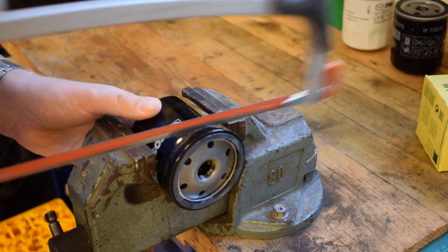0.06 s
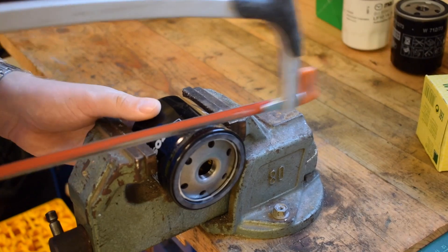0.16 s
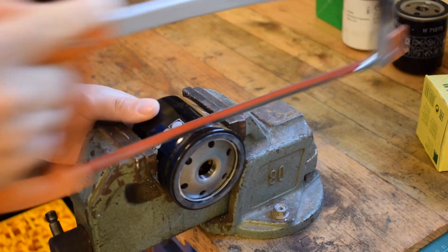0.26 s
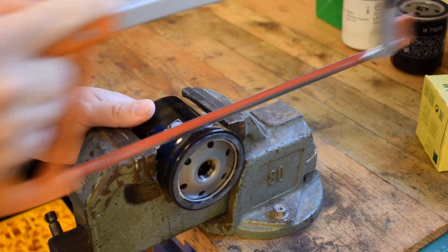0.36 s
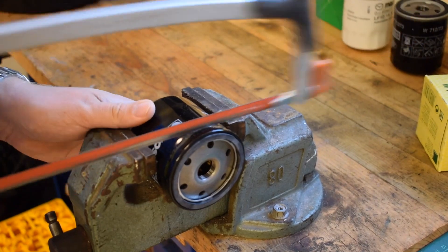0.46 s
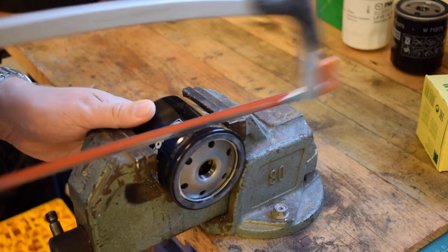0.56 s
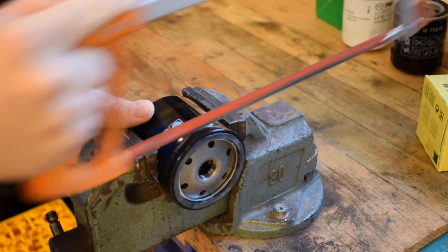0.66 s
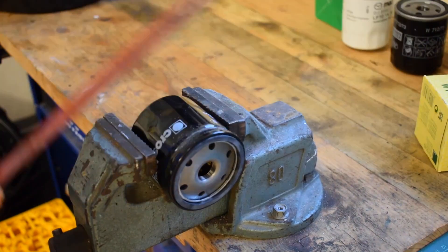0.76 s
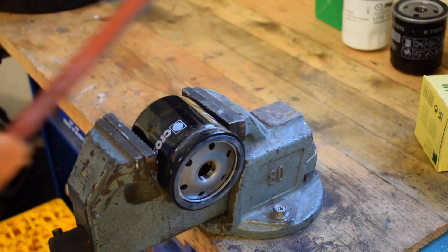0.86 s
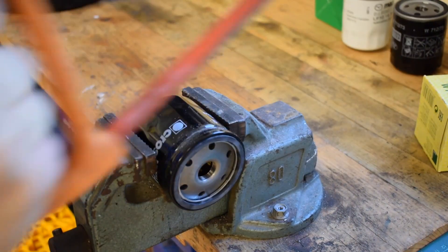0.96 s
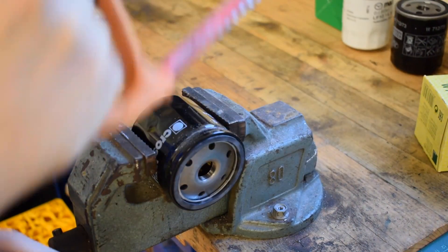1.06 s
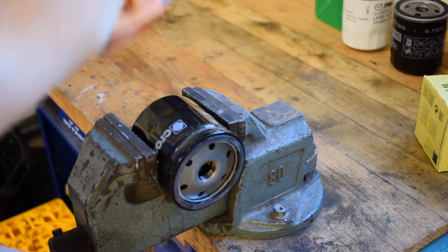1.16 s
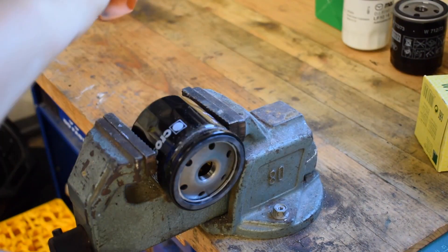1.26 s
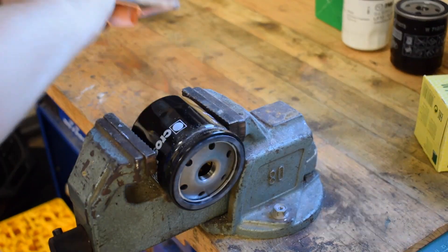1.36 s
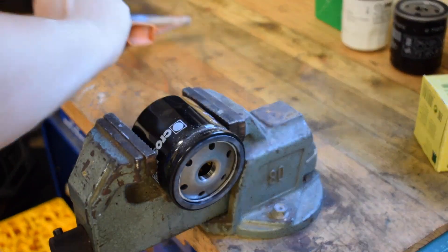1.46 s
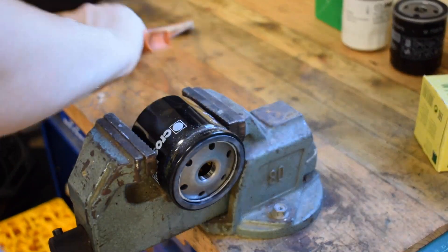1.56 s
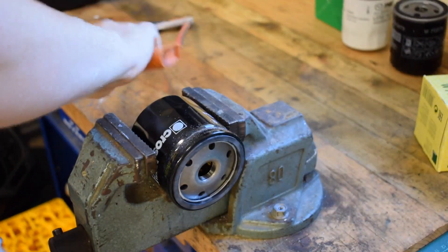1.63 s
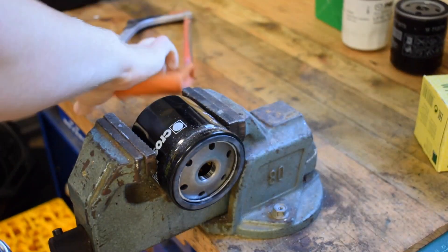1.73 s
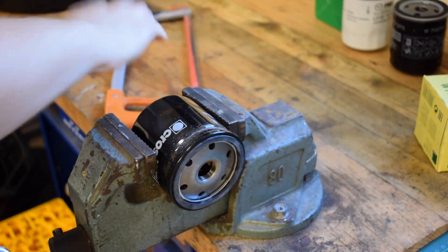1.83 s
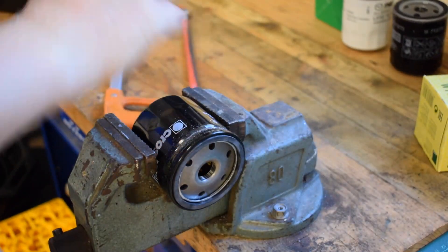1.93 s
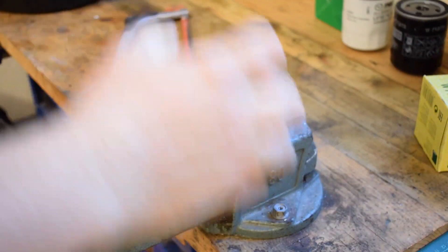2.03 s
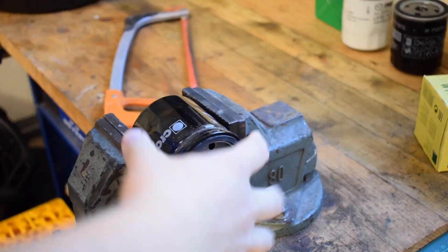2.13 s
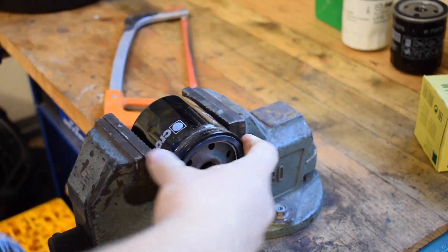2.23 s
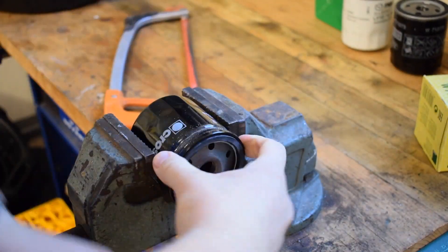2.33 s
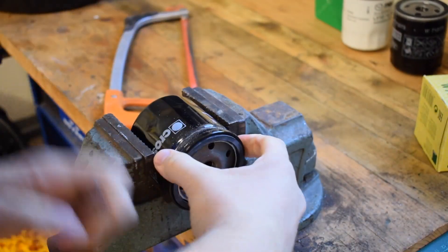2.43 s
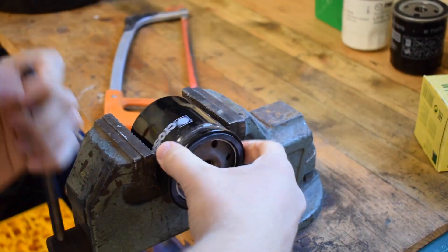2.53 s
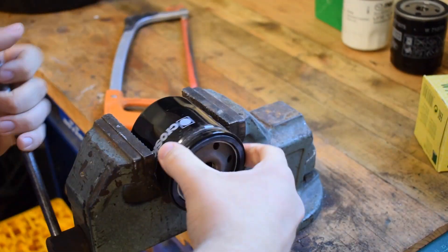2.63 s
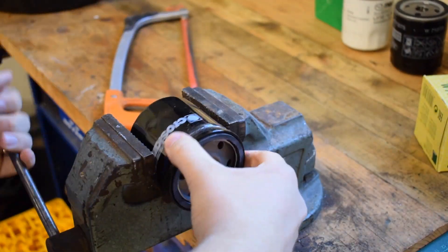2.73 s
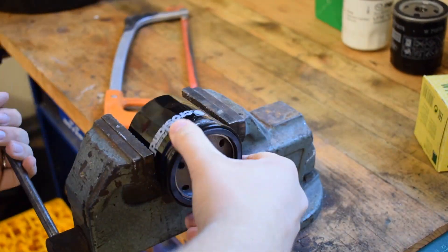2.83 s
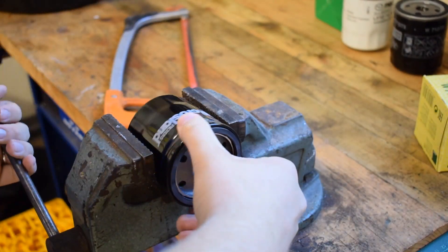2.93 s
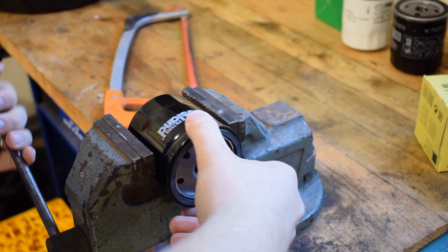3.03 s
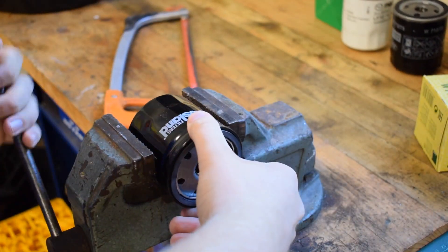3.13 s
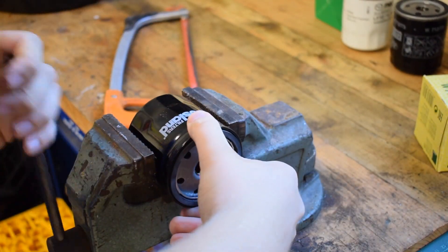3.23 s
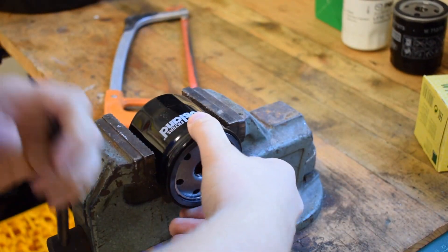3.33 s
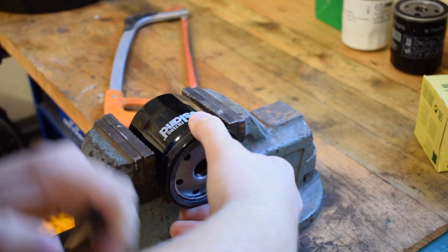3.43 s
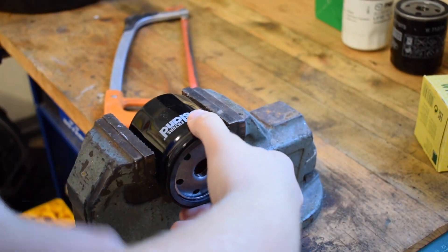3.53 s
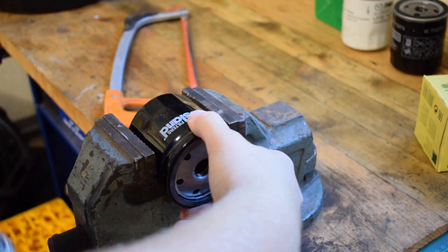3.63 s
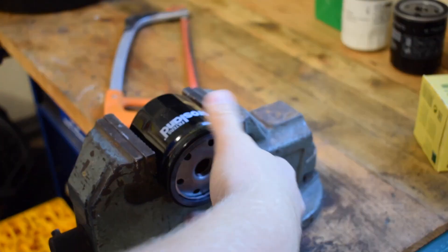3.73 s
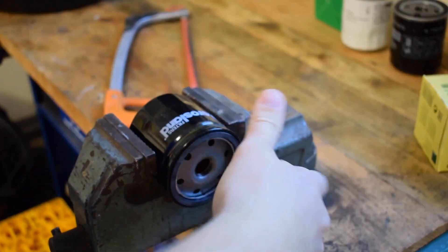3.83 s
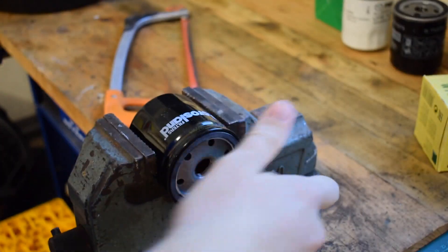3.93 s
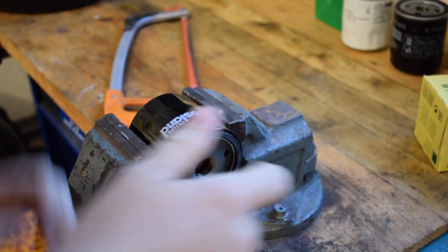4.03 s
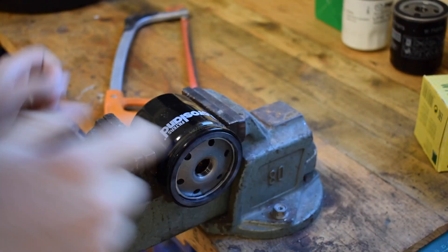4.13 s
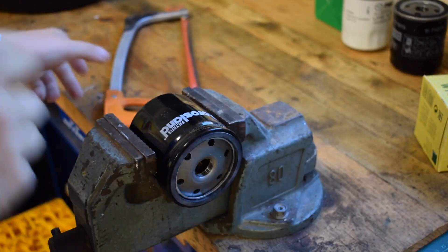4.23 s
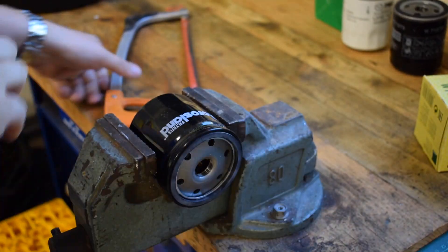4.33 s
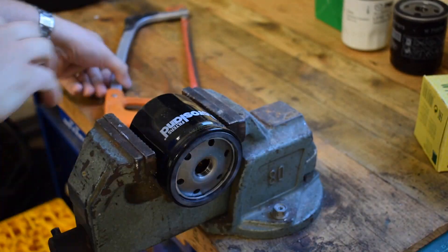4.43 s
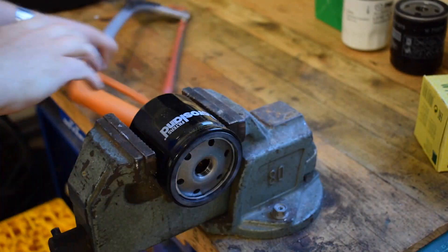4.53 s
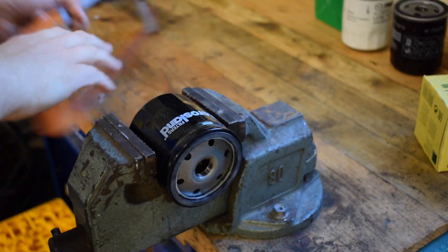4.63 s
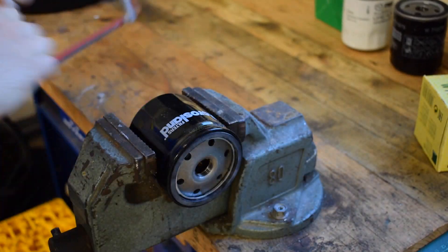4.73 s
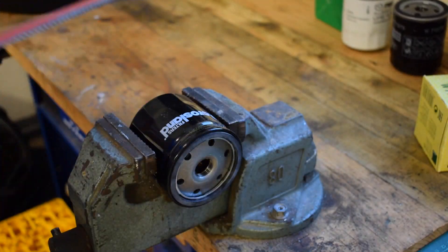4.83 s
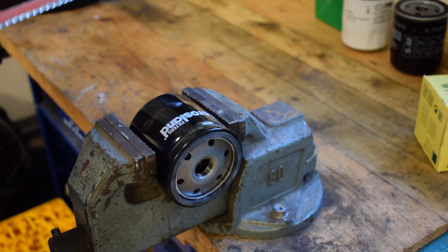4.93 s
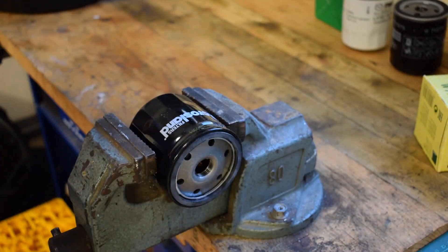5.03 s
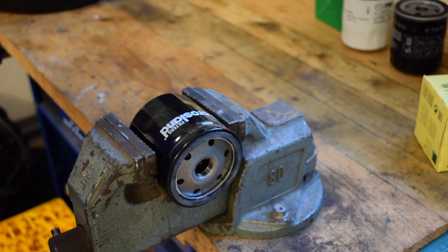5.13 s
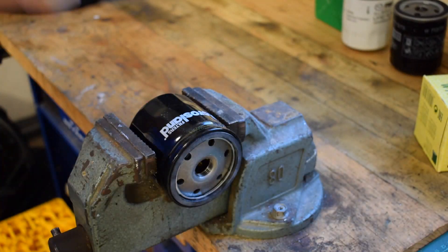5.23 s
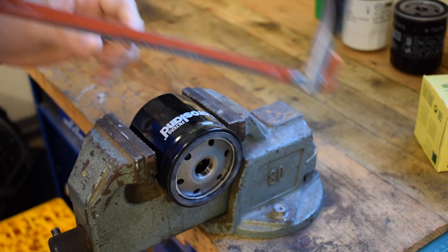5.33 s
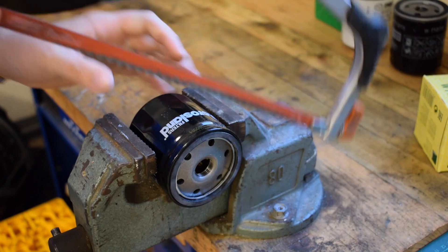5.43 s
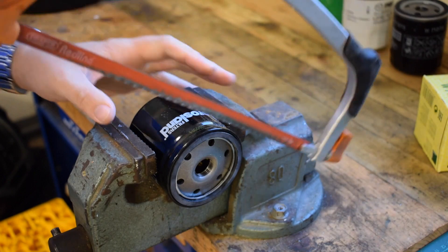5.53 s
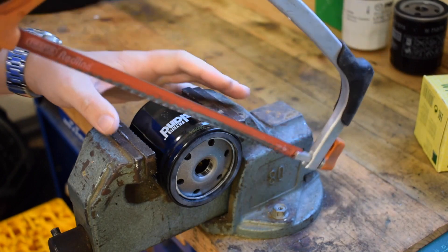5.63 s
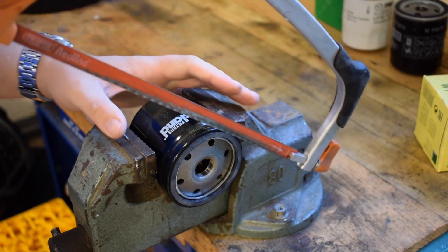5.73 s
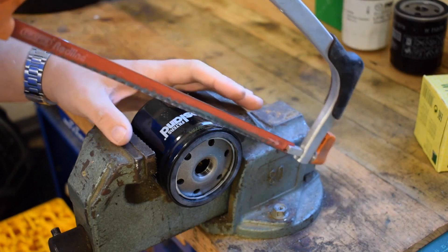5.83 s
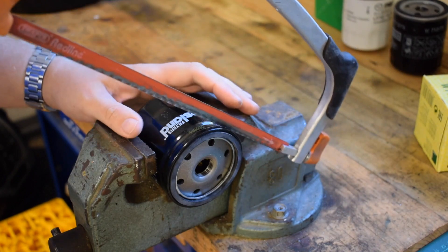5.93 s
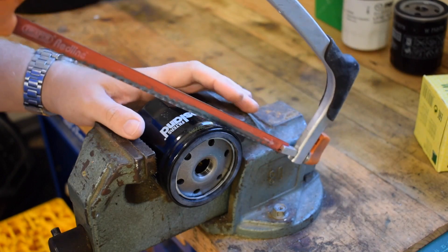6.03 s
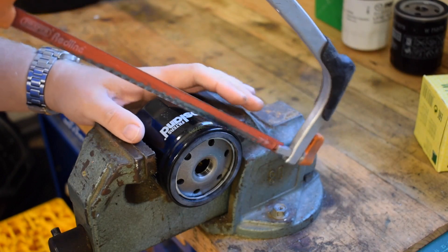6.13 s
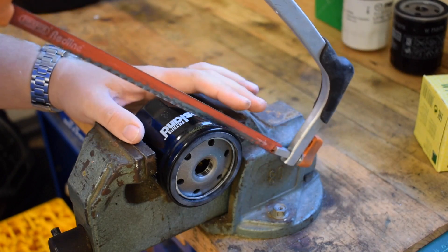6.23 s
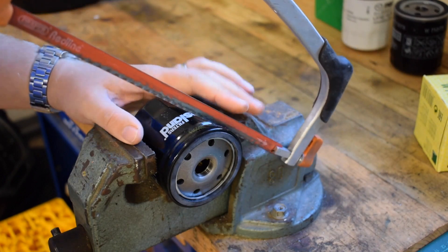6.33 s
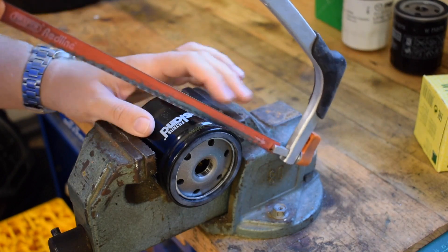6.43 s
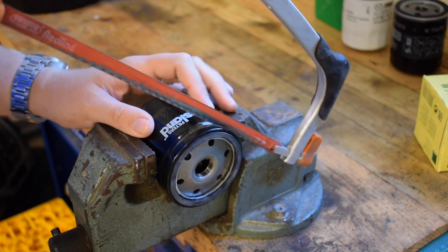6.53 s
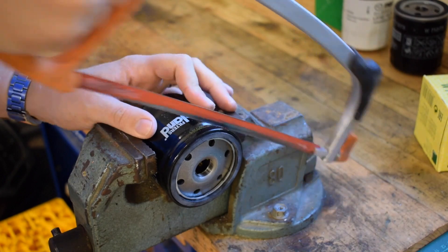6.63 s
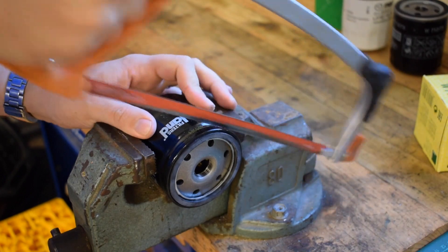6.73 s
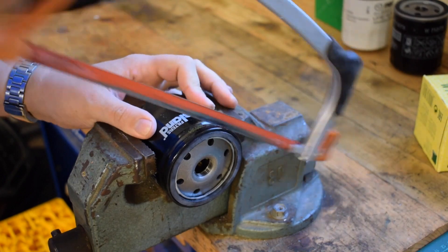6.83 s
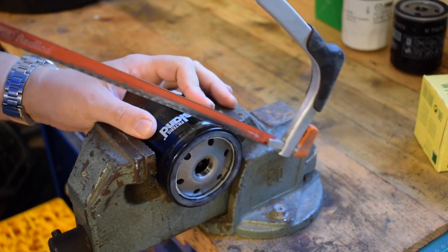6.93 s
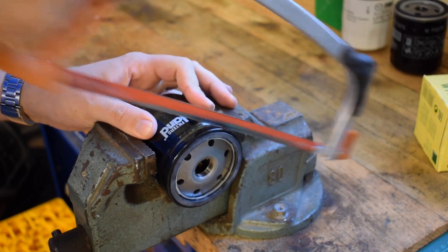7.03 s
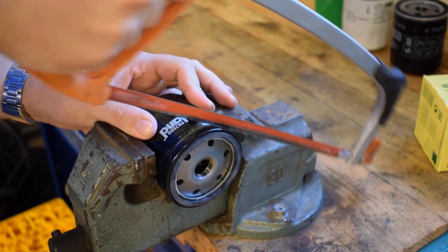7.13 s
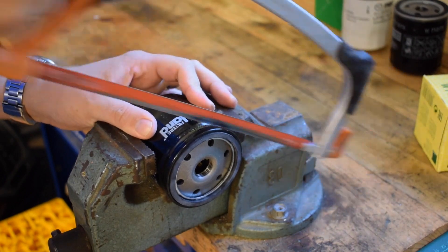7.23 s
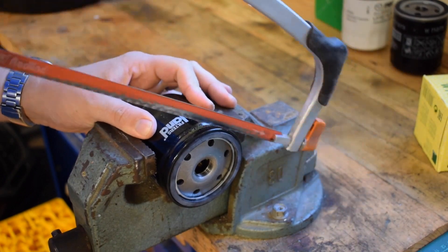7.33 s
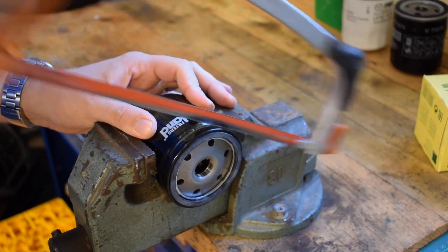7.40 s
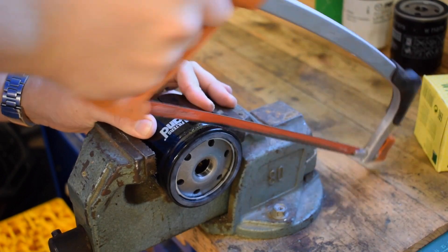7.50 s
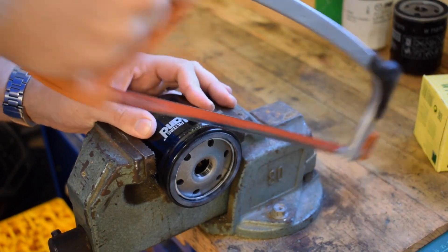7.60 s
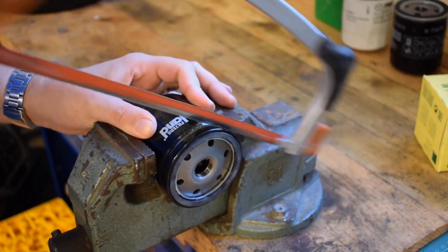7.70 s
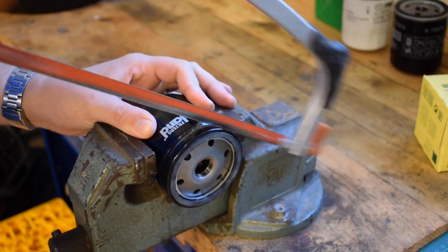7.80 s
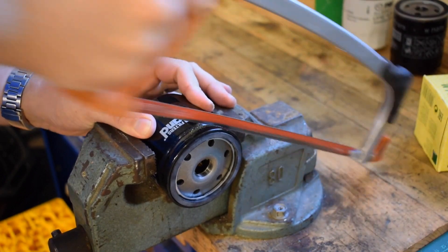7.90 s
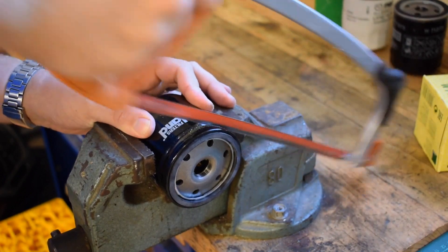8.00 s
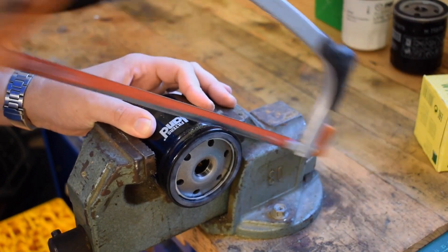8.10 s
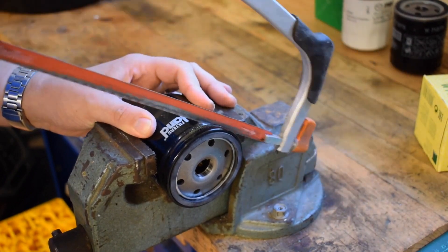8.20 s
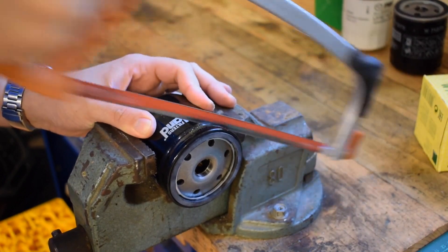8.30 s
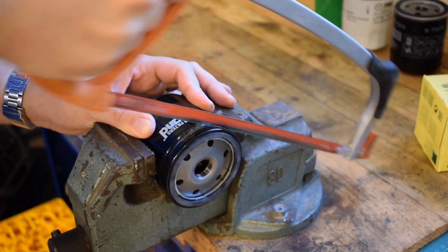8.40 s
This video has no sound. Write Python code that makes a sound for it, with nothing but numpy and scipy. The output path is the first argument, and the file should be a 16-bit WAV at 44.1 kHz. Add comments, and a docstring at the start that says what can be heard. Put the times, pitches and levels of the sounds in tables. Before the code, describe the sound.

Dry, close microphone at a workbench: gritty back-and-forth metal sawing with a hollow can resonance, stopping abruptly. Heavy wood and steel clatter peaks into distortion, then quiet garage noise with faint handle ticks and low handling rumble. A cluster of knocks as the saw is lifted, sparse light steel clinks while lining up, then longer rasping strokes, tooth whine rising and falling with blade speed.

```python
"""In a garage, close by, a hacksaw cuts a steel can held in a bench vice.
After four strokes the saw is dropped on the wooden bench, the can is turned and clamped again,
the saw is picked up, clinks against the metal and cuts on for ten strokes.
Sawing is noise and tooth bites sent through resonances, plus a whine at the tooth rate and squeals.
Knocks, clinks and ticks are fading noise and ringing tones; the loudest overload the microphone."""
import sys
import numpy as np
from scipy import signal
from scipy.fft import rfft, irfft, next_fast_len
from scipy.io import wavfile

SR = 44100
rng = np.random.default_rng(int(sys.argv[2]) if len(sys.argv) > 2 else 0)


def to_wav(s):
    """Save 16-bit WAV."""
    ch = np.atleast_2d(s).T  # columns
    pcm = np.round(np.clip(ch, -1, 1) * 32767)  # PCM
    wavfile.write(sys.argv[1], SR, pcm.astype(np.int16))


N = 373086   # length of the scene in samples


def from_db(db):
    """Decibels to gain."""
    return 10 ** (np.asarray(db) / 20)


def rms_one(x):
    """Scale to unit power."""
    return x / np.sqrt(np.mean(x ** 2) + 1e-20)


def at_hz(points, hz):
    """Read a table on a log-frequency axis."""
    table_hz, value = np.transpose(points)
    return np.interp(np.log(hz + 1e-3), np.log(table_hz), value)


def colour(x, spectrum):
    """Give x a spectrum that falls away beyond the table's ends; unit power."""
    size = next_fast_len(len(x))
    hz = np.arange(size // 2 + 1) * SR / size + 1e-3
    low_skirt = np.minimum(1, hz / spectrum[0][0]) ** 2
    high_skirt = np.minimum(1, spectrum[-1][0] / hz) ** 2
    gain = from_db(at_hz(spectrum, hz)) * low_skirt * high_skirt
    return rms_one(irfft(rfft(x, size) * gain, size)[:len(x)])


def drift(rate, size):
    """Smooth chance with spread 1, heading for a new random value rate times a second."""
    knots = np.arange(size) * rate / SR
    return rms_one(np.interp(knots, np.arange(N // 20), rng.standard_normal(N // 20)))


def resonate(x, hz, width):
    """A resonance with gain 1 on top; width in Hz."""
    r = np.exp(-np.pi * width / SR)
    top = np.array([1, 0, -1]) * (1 - r * r) / 2
    return signal.lfilter(top, [1, -2 * r * np.cos(2 * np.pi * hz / SR), r * r], x)


def clicks(times, sizes):
    """One impulse for each event."""
    out = np.full(N, 1e-18)
    np.add.at(out, (times * SR).astype(int), sizes)
    return out


def ring(x, hz, t60):
    """A unit click sets a sine of height 1 ringing; it falls by 60 dB in t60 seconds."""
    r, w = from_db(-60 / (t60 * SR)), 2 * np.pi * hz / SR
    return signal.lfilter([0, np.sin(w)], [1, -2 * r * np.cos(w), r * r], x)


def struck(times, db, modes, spread_db):
    """Every blow wakes each mode of an object with a strength of its own."""
    sizes = from_db(db[:, None] + spread_db * rng.standard_normal((len(times), len(modes))))
    out = 0
    for k, (hz, level, t60) in enumerate(modes):
        out = out + (-1) ** k * ring(clicks(times, from_db(level) * sizes[:, k]), hz, t60)
    return out


def softness(hz, corner_hz):
    """A soft contact gives little above its corner, apart from a faint click."""
    return 1 / np.sqrt(1 + (hz / corner_hz) ** 6) + .004


def blows(times, db, corner_hz, share, spectrum, decay):
    """Each blow wakes a dense crowd of modes, noise that dies away band by band."""
    edges = np.geomspace(45, 17000, 25)   # bands about a third of an octave wide
    centres = np.sqrt(edges[1:] * edges[:-1])
    gains = from_db(at_hz(spectrum, centres)) * np.sqrt(np.diff(edges))
    gains = gains * softness(centres, corner_hz[:, None])
    gains *= (from_db(db) / np.linalg.norm(gains, axis=1))[:, None]
    white, age, out = rng.standard_normal((2, N)), np.arange(SR) / SR, np.zeros(N)
    crack = 0.66 + 0.55 * np.exp(-age / 0.0049)   # the first moments stand above the tail
    starts = (times * SR).astype(int)
    for k, hz in enumerate(centres):
        band_filter = signal.butter(2, edges[k:k + 2], "band", fs=SR, output="sos")
        band = rms_one(signal.sosfilt(band_filter, white[k % 2]))
        swell = crack * (1 - np.exp(-age * min(hz, 1500)))   # low bands build up more slowly
        for at, gain, t60 in zip(starts, gains[:, k], share * at_hz(decay, hz)):
            fade = swell * np.exp(-np.log(1000) * age / t60)
            out[at:at + SR] += gain * band[at:at + SR] * fade[:N - at]
    return out


def crowd(x, above_hz, t60, wet):
    """Thin steel and the near walls add a dense crowd of short resonances."""
    age = np.arange(SR // 5) / SR
    tail = rng.standard_normal(len(age)) * np.exp(-np.log(1000) * age / t60)
    tail = tail / np.linalg.norm(tail)
    tail = signal.sosfilt(signal.butter(2, above_hz, "high", fs=SR, output="sos"), tail)
    direct = signal.sosfilt(signal.butter(1, above_hz, "high", fs=SR, output="sos"), x)
    dry_share, wet_share = 1 / np.hypot(1, wet), wet / np.hypot(1, wet)
    return x - (1 - dry_share) * direct + wet_share * signal.fftconvolve(x, tail)[:len(x)]


FIRST_SPAN, SECOND_SPAN = (-.03, .805), (6.575, 8.63)   # the blade is in the cut: from s, to s


def in_cut(times):
    """Whether the blade is pressed into the can at these times."""
    return sum((times > start) & (times < end) for start, end in (FIRST_SPAN, SECOND_SPAN)) > 0


# Colour of the steady garage noise. Each row: pitch in Hz, relative level in dB per Hz.
AIR = [(30, -9), (60, -10), (110, -12.5), (215, -10), (300, -16.5), (470, -14), (800, -17.5), (1300, -17),
       (3000, -25.5), (8900, -33), (15700, -44)]
# Colour of the low rumble. Each row: pitch in Hz, relative level in dB per Hz.
RUMBLE = [(45, -8.5), (100, -1.5), (150, -2), (210, 1), (330, -7), (470, -9), (1200, -17.5), (2500, -21.5)]
# The rumble's rise and fall while the saw is lifted away, the can is reset and the saw is lined up.
# Three lists, one for each step. Each row: time in seconds, level in dB before the trim below.
HANDLING = [
    [(0.83, -40), (0.978, -48), (1.354, -47.5), (1.53, -46)],
    [(3.0, -49.5), (3.142, -57), (3.622, -58.5), (4.28, -53)],
    [(4.8, -53.5), (5.608, -62.5), (5.838, -54), (6.55, -49)],
]
AIR_DB = -57
HANDLING_TRIM_DB, SAWING_RUMBLE_DB = 2, -33.5   # added to HANDLING; rumble of the bench under the saw


def background():
    """Steady garage noise and a low rumble of handling, stronger under the saw."""
    t = np.arange(N) / SR
    handling_db = HANDLING_TRIM_DB + np.interp(t, *np.vstack(HANDLING).T)
    rumble_db = np.where(in_cut(t), SAWING_RUMBLE_DB, handling_db)
    air = from_db(AIR_DB) * colour(rng.standard_normal(N), AIR)
    return air + from_db(rumble_db) * colour(rng.standard_normal(N), RUMBLE)


# Small steel ticks of the vice handle and the saw. Each row: start in seconds, level in dB.
TICKS = [(0.909, -58), (1.562, -33), (1.87, -13), (2.497, -44.5), (2.555, -43), (2.762, -40), (2.788, -60),
         (2.868, -47), (3.027, -50.5), (3.372, -56.5), (3.712, -52), (3.76, -56), (3.894, -62), (4.31, -44),
         (4.524, -47.5)]
# Colour of a tick's noise. Each row: pitch in Hz, relative level in dB per Hz.
TICK_COLOUR = [(2500, -28.5), (3800, -14), (4500, 0), (6000, -1), (8500, -3.5), (12000, -4), (16000, -14)]
# How long that noise lasts. Each row: pitch in Hz, seconds to fall 60 dB before TICK_RING_SHARE.
TICK_T60 = [(4000, 0.29), (14000, 0.1134)]
# Tones of the vice handle. Each row: pitch in Hz, relative level in dB, seconds to fall 60 dB.
HANDLE = [(4460, -3.5, .16), (4980, 0, .22), (5770, 1, 0.17), (6200, -6.5, 0.29), (7070, -3, .16),
          (8802, -8, .15), (11700, -7.5, .16), (12000, -11, .18)]
TICK_HZ, TICK_RING_SHARE = 11500, 0.95   # dull above this pitch; share of the noise's fading time


def vice(ring_db):
    """The loose handle ticks when the bench is jolted and as the jaws close on the can."""
    times, db = np.transpose(TICKS)
    alike = np.ones(len(times))
    ticks = blows(times, db, TICK_HZ * alike, TICK_RING_SHARE * alike, TICK_COLOUR, TICK_T60)
    return ticks + struck(times, db + ring_db, HANDLE, spread_db=0.5)


# Knocks that shake the bench. Each row: start in seconds, thud level in dB, pitch in Hz above which
# it is dull, seconds it rattles on, level of the frame's ring in dB.
KNOCKS = [(0.283, -20.5, 403, .01, -45), (1.56, -3, 1670, 0.097, -4.5), (1.714, -19.5, 1426, 0.07, -22),
          (1.87, 5.5, 3630, 0.15, -6), (2.006, -9.5, 1075, 0.13, -7), (2.161, -37, 990, 0.055, -33),
          (2.286, -37.5, 2200, .01, -57), (2.56, -26, 376, 0.12, -42), (2.764, -27.5, 530, 0.092, -46),
          (2.961, -41, 1100, 0.083, -58), (3.029, -36, 248, 0.021, -56), (4.311, -21.5, 880, 0.018, -39),
          (4.444, -18.5, 770, 0.045, -31), (4.487, -13.5, 1240, .1, -35), (4.535, -12, 940, 0.028, -25),
          (6.183, -27, 405, .06, -55), (7.966, 4, 426, .01, -27)]
BOUNCE_S = .03   # average gap between bounces
BOUNCE_LOSS_DB, RATTLE_FADE_DB = 7, 16.5   # drop to the bounces; further drop over the whole rattle
BOUNCE_DULL_HZ = 1100   # a bounce is a soft contact: dull above this at the most


def rattle(count):
    """Each knock is followed by softer, fading bounces for as long as it rattles."""
    s, db, corner_hz, rattle_s, ring_db = np.transpose(KNOCKS)[:, :, None]
    k = np.arange(count)
    bounce = k > 0   # number 0 is the knock itself
    delay = BOUNCE_S * (k + bounce * rng.uniform(-0.22, .25, (len(KNOCKS), count)))
    loss_db = bounce * BOUNCE_LOSS_DB + RATTLE_FADE_DB * delay / rattle_s
    dull_hz = np.where(bounce, np.minimum(corner_hz, BOUNCE_DULL_HZ), corner_hz)
    heard = delay <= rattle_s
    return [column[heard] for column in (s + delay, db - loss_db, dull_hz, ring_db - loss_db)]


# Colour of a thud on the bench. Each row: pitch in Hz, relative level in dB per Hz.
BENCH_COLOUR = [(50, -22), (100, -17), (180, -9), (260, -5.5), (370, -3), (460, -4), (620, 0.5),
                (850, -3.5), (1250, -6), (1700, -10.5), (2500, -14), (5000, -31), (9000, -25),
                (16000, -23.5)]
# How long a thud lasts. Each row: pitch in Hz, seconds to fall 60 dB before the shares below.
BENCH_T60 = [(80, 0.7), (260, 0.56), (700, 0.47), (1800, 0.51), (5000, 0.87), (14000, 0.25)]
# Saw frame and bench ringing on. Each row: pitch in Hz, relative level in dB, seconds to fall 60 dB.
FRAME = [(117, -26.5, 1.2), (217, -17.5, 0.87), (257, -9.5, 0.51), (306.8, -10.5, 0.45), (378, -3.5, 0.3),
         (396, -28, 2.2), (503, -12.5, 0.41), (573, -11.5, 0.81), (636, -4.5, 0.3), (755, -8.5, .45),
         (798, -10, 0.44), (894, -12, .3), (935, -9.5, 0.26), (1091, -10.5, .25), (1160, -12, .25),
         (1520, -16.5, 0.33)]
# share of the thud's fading time: free, and with the saw pressed into the cut
BENCH_RING_SHARE, BENCH_HELD_SHARE = 0.66, 0.45


def bench():
    """Wood thuds and the saw frame rings on."""
    times, db, corner_hz, ring_db = rattle(count=9)
    share = np.where(in_cut(times), BENCH_HELD_SHARE, BENCH_RING_SHARE)
    out = blows(times, db, corner_hz, share, BENCH_COLOUR, BENCH_T60)
    sizes = from_db(ring_db + rng.normal(0, 1.2, (len(db), len(FRAME))).T)
    for size, (hz, level, t60) in zip(sizes, FRAME):
        hits = clicks(times, size * softness(hz, corner_hz))
        out = out + ring(hits * from_db(level), hz, t60)
    return out


# The saw touching can and vice. Each row: start in seconds, clash level in dB, pitch in Hz above
# which it is dull, level of the saw's ring in dB.
CLINKS = [(0.392, -22, 3300, -38), (0.795, -34, 8900, -67), (2.412, -46, 2320, -62), (3.1, -55, 2300, -80),
          (4.486, -58, 3000, -50), (5.024, -42, 12300, -43.5), (5.227, -36, 4930, -24.5),
          (5.642, -31, 11050, -47), (5.79, -49.5, 9000, -66), (5.887, -36, 3420, -49),
          (6.011, -51.5, 1990, -73.5), (6.179, -20, 8800, -35.5), (6.415, -40, 4500, -66.5),
          (6.599, -21, 9100, -48), (6.782, -23, 8500, -41), (6.799, -27, 12000, -51),
          (6.823, -24, 12000, -45), (6.841, -11, 14300, -26)]
# Colour of a clash. Each row: pitch in Hz, relative level in dB per Hz.
CLINK_COLOUR = [(71, -60), (120, 0.5), (253, -30), (330, -5.5), (437, -12.5), (852, -8.5), (1130, -8),
                (1870, -14), (2590, -11), (3570, -17), (4840, -14.5), (15000, -20.5)]
# How long a clash lasts. Each row: pitch in Hz, seconds to fall 60 dB before the shares below.
CLINK_T60 = [(200, 0.8), (2000, 0.61), (6000, 0.29), (14000, 0.069)]
# Tones of blade and bow. Each row: pitch in Hz, relative level in dB, seconds to fall 60 dB.
STEEL = [(1030, -11, 0.21), (1205, -30, 0.16), (2080, -20, .3), (2157, -12, .2), (2190, -14, 0.31),
         (3000, 0, .1), (3230, -22, .08), (3310, -14, 0.4), (3420, -8, 0.19), (3440, -0.5, .16),
         (3930, -22, 0.17), (6150, -16, 0.093), (8510, -21, .12)]
# Tones of the can in the jaws. Each row: pitch in Hz, relative level in dB, seconds to fall 60 dB.
CAN = [(1124, -1.5, 0.19), (1238, -8, 0.2), (1690, -13, 0.57), (1840, -4, 0.16), (2038, 1, 0.12),
       (2720, -13, 0.071), (2840, -26, 0.23), (3860, -5.5, 0.028), (5400, -30, 0.062), (7740, -9, 0.063),
       (7800, -20, 0.043), (9250, -17, .2)]
# free, and with the saw pressed into the cut: share of the clash's fading time; can ring against clash
CLINK_RING_SHARE, CLINK_HELD_SHARE = 0.65, .14
CAN_RING_DB, CAN_HELD_DB = -6.5, -29


def clinks():
    """Steel on steel: a short clash, then saw and can ring; pressure shortens clash, quiets can."""
    times, db, corner_hz, saw_db = np.transpose(CLINKS)
    held = in_cut(times)
    share = np.where(held, CLINK_HELD_SHARE, CLINK_RING_SHARE)
    can_db = db + np.where(held, CAN_HELD_DB, CAN_RING_DB)
    clash = blows(times, db, corner_hz, share, CLINK_COLOUR, CLINK_T60)
    clash = crowd(clash, above_hz=350, t60=0.079, wet=0.58)
    saw_ring = struck(times, saw_db, STEEL, spread_db=4.5)
    return clash + saw_ring + struck(times, can_db, CAN, spread_db=0.5)


# The blade catches in the cut and sings or shakes the bench. Each row: middle in seconds,
# pitch in Hz, glide in Hz per second, level in dB.
SQUEALS = [(0.065, 1763, 600, -20.5), (.10, 2160, 0, -22.5), (0.298, 206, 6, -25), (.41, 2220, -5, -24),
           (0.758, 654, -1200, -20.5), (6.704, 98.8, -3, -26), (6.87, 64, 0, -35), (6.898, 371, -3, -20.5),
           (7.31, 101.2, 0, -30), (7.736, 923, -1200, -18), (8.131, 1915, -1500, -19),
           (8.187, 888, -600, -18)]
# time from the peak to half height for a tone at the reference pitch; lower tones last longer
SQUEAL_HALF_S, SQUEAL_REF_HZ, SQUEAL_LENGTH_POWER = .03, 990, .22
SQUEAL_WOBBLE_HZ = 9


def squeals(flutter_db):
    """Short, unsteady tones that swell and fade within the sawing."""
    out = np.zeros(N)
    for s, hz, glide, db in SQUEALS:
        half = SQUEAL_HALF_S * (SQUEAL_REF_HZ / hz) ** SQUEAL_LENGTH_POWER
        at = np.arange(max(0, int((s - 2 * half) * SR)), min(N, int((s + 2 * half) * SR)))
        t = at / SR - s
        pitch = hz + glide * t + SQUEAL_WOBBLE_HZ * drift(336, len(at))
        phase = 2 * np.pi * np.cumsum(pitch) / SR
        level = np.sqrt(2) * from_db(db + flutter_db * drift(153, len(at)))
        out[at] += level * np.hanning(len(at)) * np.sin(phase)
    return out


TURN_SHARE = .52   # the arm turns this far between one fastest moment and the next
PULL_PEAKEDNESS = 0.65   # the rasp peaks less sharply on the pull than on the push


def sawing(strokes, span, body_modes, rasp_spectrum, body_db, wander_db, grit, jitter, judder_db,
           body_power, rasp_power, whine_power, turn_body, turn_rasp, blur, overtone_db, dull_hz):
    """Teeth cross the can's wall at a rate set by blade speed; each tears a chip and shakes the can."""
    fastest, top_rate, rasp_db, whine_db = np.transpose(strokes)
    turns = fastest[:-1] + TURN_SHARE * np.diff(fastest)
    start, end = np.append(span[0], turns), np.append(turns, span[1])
    first, last = max(0, int(start[0] * SR)), min(N, int(end[-1] * SR))
    t = np.arange(first, last) / SR
    size = len(t)
    # the arm speeds the blade up and stops it again at every turn
    marks = np.append(np.column_stack([start, fastest]).ravel(), end[-1])
    arm_angle = np.pi / 2 * np.interp(t, marks, np.arange(len(marks)))
    speed = np.abs(np.sin(arm_angle)) + 1e-4
    stroke = np.clip(np.searchsorted(start, t) - 1, 0, len(start) - 1)
    rate = top_rate[stroke] * speed ** .6 * (1 + jitter * drift(500, size))
    teeth = np.cumsum(rate) / SR   # how many teeth have passed
    # uneven bites, and friction noise that surges with each tooth
    bites = np.diff(np.floor(teeth), prepend=0) * (.5 + rng.standard_normal(size))
    friction = rng.standard_normal(size) * (1 + 0.088 * np.cos(2 * np.pi * teeth))
    judder = from_db(judder_db * drift(170, size))
    force = (rms_one(bites) * grit + rms_one(friction)) * judder
    # the point of contact shifts, so each resonance comes and goes
    body = np.zeros(size)
    for k, (hz, width, db) in enumerate(body_modes):
        gain = from_db(db + wander_db * drift(14, size))
        body += (-1) ** k * gain * resonate(force, hz, width)
    body = rms_one(body)
    rasp = colour(force, rasp_spectrum)
    # the free length of blade changes with its travel, so the echo from its end sweeps through the rasp
    travel = .5 - .5 * np.cos(arm_angle)
    lag = (.0016 + 0.001227 * travel) * SR
    echo = np.interp(np.arange(size) - lag, np.arange(size), rasp)
    rasp = rms_one(rasp + .35 * echo)
    dull = signal.sosfilt(signal.butter(1, dull_hz, fs=SR, output="sos"), rasp)
    rasp = dull + (rasp - dull) * np.sqrt(speed)   # a slow blade sounds duller
    # at full speed the teeth fall into step and the blade whines
    tone = np.sin(2 * np.pi * teeth) * from_db(2.5 * drift(140, size))
    # uneven teeth smear the whine and its overtones into bands that glide with the speed
    smear = np.zeros(size)
    for k in range(1, 4):
        sine_part = drift(260 * k, size) * np.sin(2 * np.pi * k * teeth)
        cosine_part = drift(260 * k, size) * np.cos(2 * np.pi * k * teeth)
        smear += from_db(overtone_db * np.log2(k)) * (sine_part + cosine_part)
    whine = rms_one(tone + blur * smear)
    # body and rasp keep a share of their level at the turns; the whine all but vanishes there
    body_level = from_db(body_db) * (turn_body + (1 - turn_body) * speed ** body_power)
    peakedness = rasp_power * np.where(stroke % 2, PULL_PEAKEDNESS, 1)
    rasp_level = from_db(np.interp(t, fastest, rasp_db))
    rasp_level = rasp_level * (turn_rasp + (1 - turn_rasp) * speed ** peakedness)
    whine_level = from_db(whine_db[stroke]) * speed ** whine_power
    sound = body * body_level + rasp * rasp_level + whine * whine_level
    # the blade's contact fades in and out at the ends of the cut
    contact = np.clip((t - start[0]) / 0.014, 0, 1) * np.clip((end[-1] - t) / 0.0034, 0, 1)
    return np.pad(sound * contact, (first, N - last))


# Strokes, push and pull in turn. Each row: fastest moment in seconds, teeth per second at full
# speed, rasp level in dB, whine level in dB.
FIRST_STROKES = [(.08, 895, -18.5, -44), (.275, 1205, -20.5, -18.5), (.472, 1160, -18, -21),
                 (.68, 1390, -20, -20)]
# Resonances of can, blade and vice. Each row: pitch in Hz, width in Hz, relative level in dB.
FIRST_BODY = [(121, 46, -0.5), (175, 24, 6), (204.5, 10.7, 6.5), (358.5, 13.5, 9.5), (716, 120, -5),
              (983, 35, 1), (1112, 84, 5.5), (1330, 45, -19), (1740, 14, -15), (2295, 45, -4)]
# Colour of chips tearing off. Each row: pitch in Hz, relative level in dB per Hz.
FIRST_RASP = [(1400, -3), (2150, 6), (2500, -0.5), (3300, 1.5), (4000, -6), (4700, -3), (5600, -3.5),
              (7000, -4), (8100, -0.5), (9200, -6.5), (11000, -7), (13500, -12.5), (15800, -21)]


def first_cut():
    """Four strokes, with the can in its first clamping and its resonances."""
    return sawing(FIRST_STROKES, FIRST_SPAN, FIRST_BODY, FIRST_RASP,
                  body_db=-19.5, wander_db=3.0, grit=0.64, jitter=.035, judder_db=1.2,
                  body_power=1.3, rasp_power=2.45, whine_power=3.6, turn_body=0.63, turn_rasp=0.24,
                  blur=1.0, overtone_db=-12.0, dull_hz=5000)


# Strokes, push and pull in turn. Each row: fastest moment in seconds, teeth per second at full
# speed, rasp level in dB, whine level in dB.
SECOND_STROKES = [(6.64, 696, -24.5, -41), (6.868, 846, -25.5, -26), (7.07, 920.4, -21, -17),
                  (7.28, 818, -25.5, -38), (7.472, 1200, -20.5, -14.5), (7.695, 1021, -22.5, -25),
                  (7.888, 1259, -19, -10.5), (8.125, 964, -22, -15), (8.328, 1120, -19.5, -11),
                  (8.52, 952, -19.5, -24)]
# Resonances after clamping again. Each row: pitch in Hz, width in Hz, relative level in dB.
SECOND_BODY = [(104.4, 16, -2.5), (164, 24.6, 0), (221.9, 11.5, 4.5), (301, 30, -4.5), (381, 50, -0.5),
               (506.4, 15.3, 1.5), (595, 37, -0.5), (816, 64, -2.5), (930, 103, -4.5), (1055, 74, -1),
               (1268, 39, -4.5), (1445, 8.7, -23), (1810, 280, -19.5), (2230, 19, -4)]
# Colour of chips tearing off. Each row: pitch in Hz, relative level in dB per Hz.
SECOND_RASP = [(1400, -2.5), (2150, 0.5), (2500, -6), (3000, -1.5), (3700, -7), (4800, -4.5), (5900, -10.5),
               (7900, -7.5), (9500, -13.5), (11500, -15.5), (13300, -19), (15800, -29)]


def second_cut():
    """Ten strokes; the can clamped anew has other resonances."""
    return sawing(SECOND_STROKES, SECOND_SPAN, SECOND_BODY, SECOND_RASP,
                  body_db=-17.5, wander_db=2.5, grit=0.63, jitter=.035, judder_db=0.93,
                  body_power=1.18, rasp_power=2.3, whine_power=5.1, turn_body=0.4, turn_rasp=0.24,
                  blur=0.37, overtone_db=-11.5, dull_hz=3520)


def scene():
    """Two spells of sawing with the handling in between."""
    saw = crowd(first_cut() + second_cut(), above_hz=2600, t60=.03, wet=.4)
    handling = vice(ring_db=-13.5) + bench() + clinks()
    return (background() + handling + squeals(flutter_db=3.5) + saw)[None]


CUTOFF_HZ = 15850


def record(dry):
    """The input overloads at full scale and cuts off the peaks; a steep filter removes the top treble."""
    clipped = np.clip(dry, -1, 1)
    return signal.sosfilt(signal.ellip(10, .1, 70, CUTOFF_HZ, fs=SR, output="sos"), clipped)


dry = scene()
out = record(dry)
to_wav(out)
```